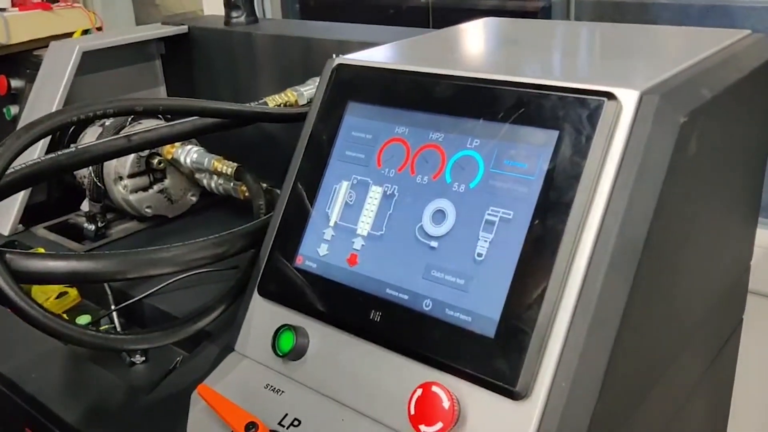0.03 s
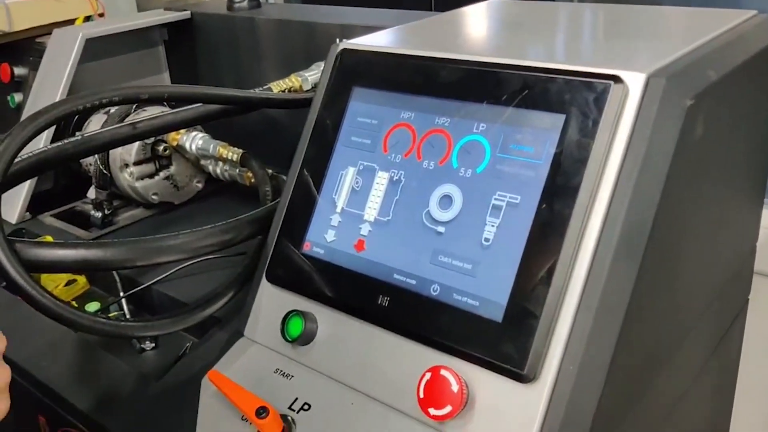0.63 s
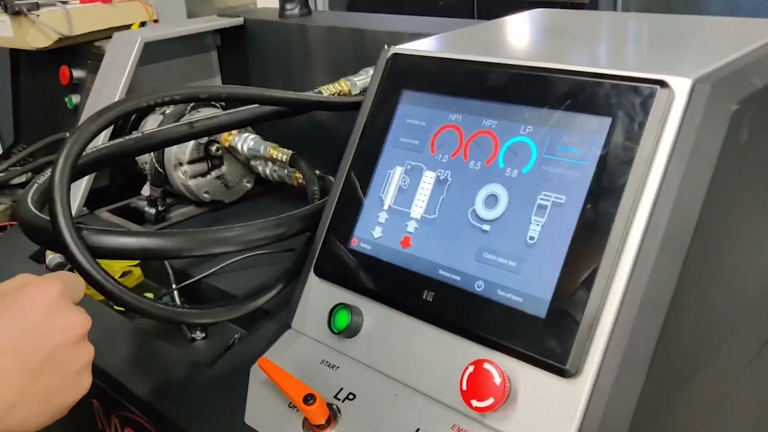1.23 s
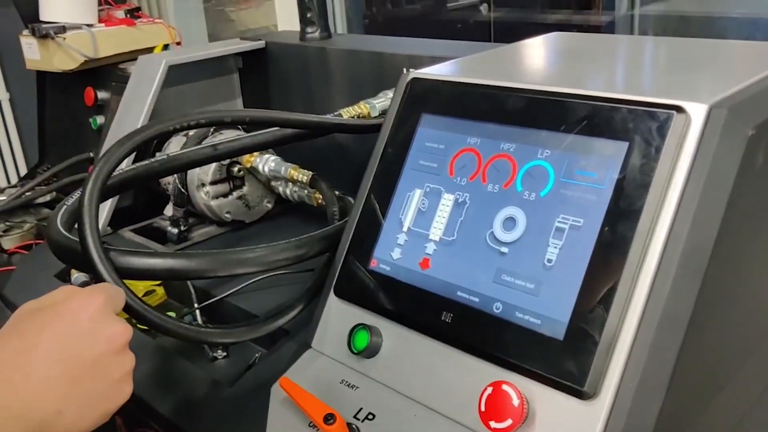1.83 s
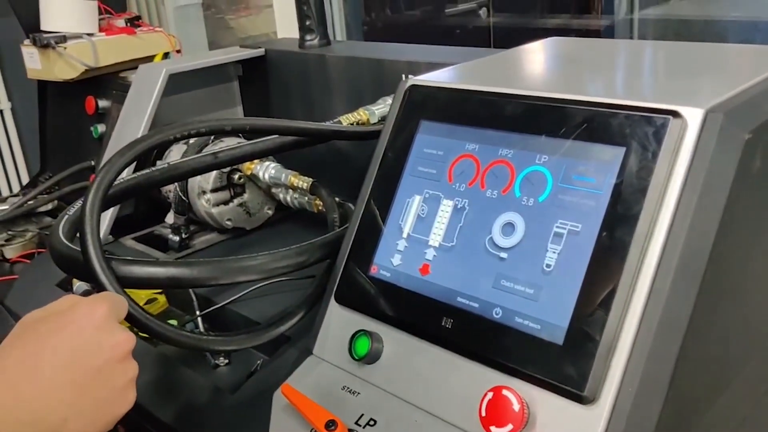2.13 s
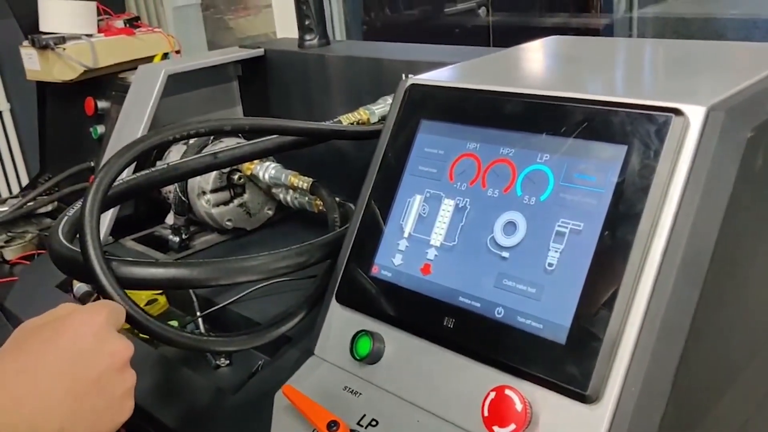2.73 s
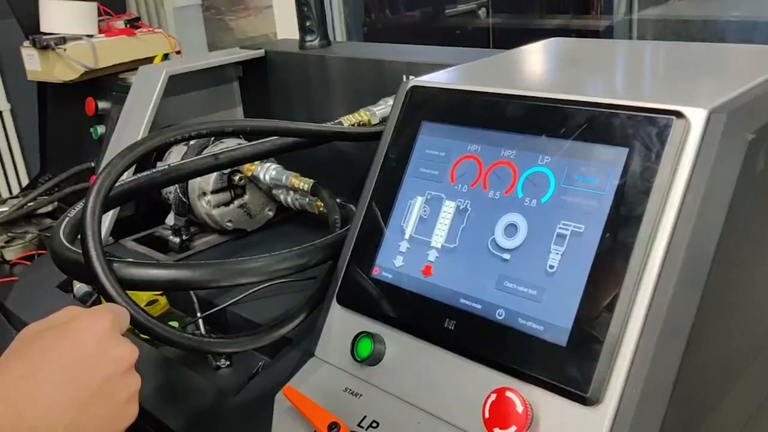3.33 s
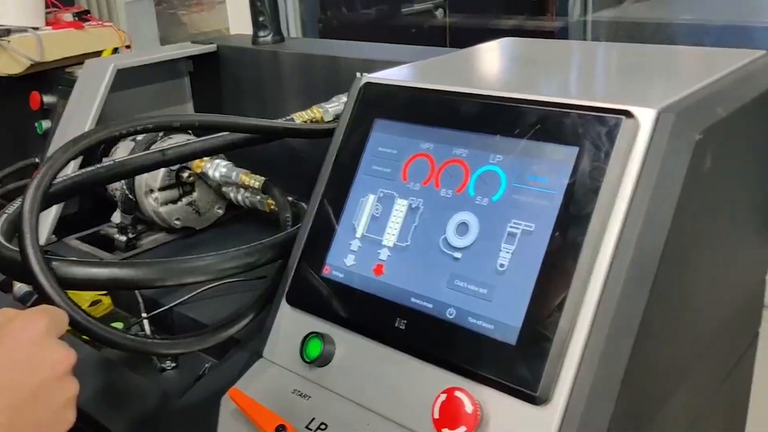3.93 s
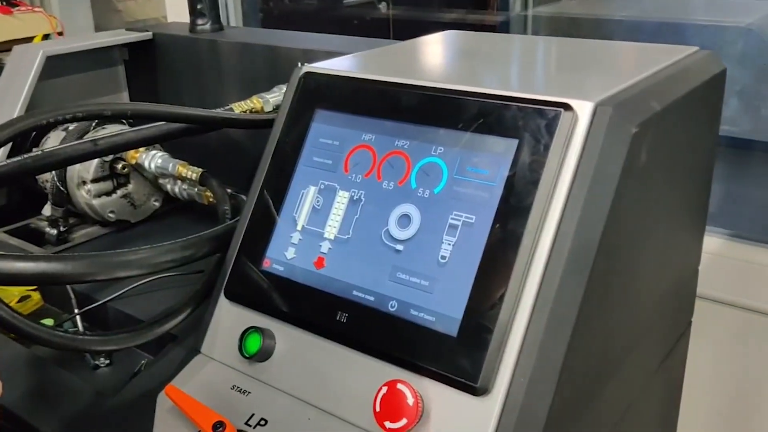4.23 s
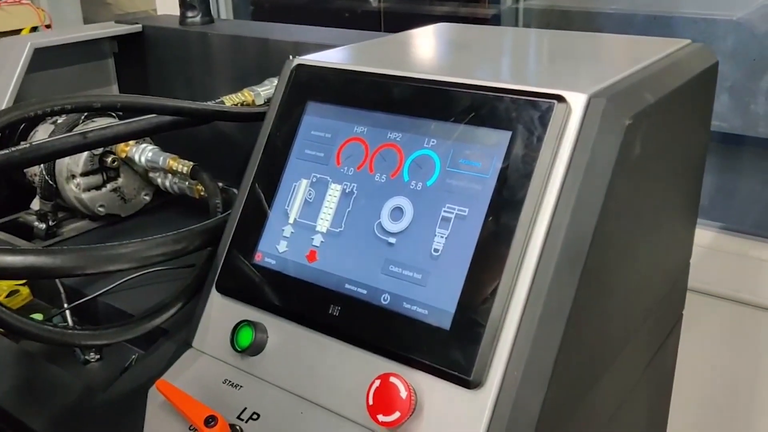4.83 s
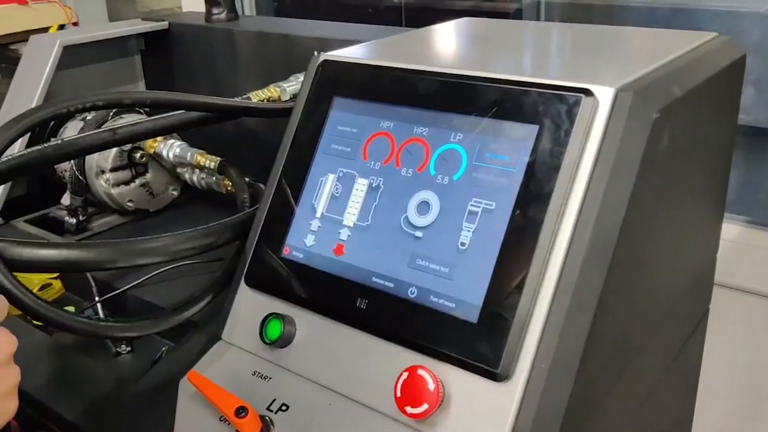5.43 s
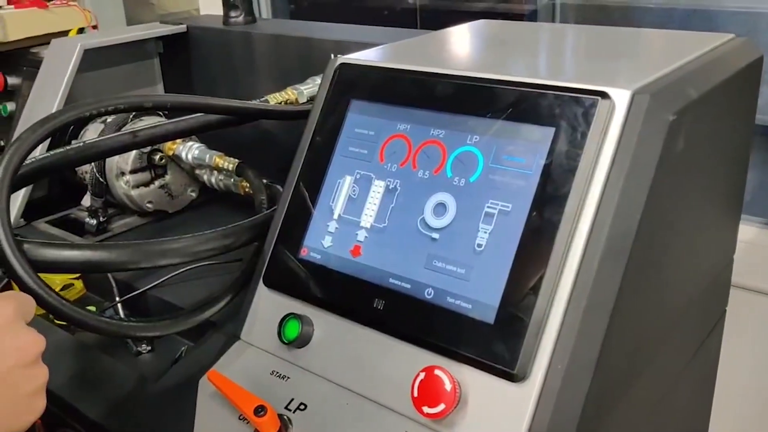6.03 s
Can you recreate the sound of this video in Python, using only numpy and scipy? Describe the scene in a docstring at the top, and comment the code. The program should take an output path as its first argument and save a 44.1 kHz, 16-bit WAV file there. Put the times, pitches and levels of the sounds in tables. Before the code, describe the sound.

A fuel pump runs at constant speed on a workshop test bench, heard close by. A low electric hum throbs slowly under a high whine and a fast metallic rattle. Valves tick unevenly, now and then snapping harder, while fluid hisses in the lines over fan noise. Just after one second a puff of air brushes the left microphone. The whine swells slightly near two seconds, and the pump runs on.

```python
"""A fuel pump runs at steady speed on a test bench in a workshop, heard from beside the control panel.
From the start, the motor's mains hum beats slowly against a pump tone at four times the shaft speed.
Strokes knock in the housing under a whine, valves tick unevenly and fluid hisses in the lines, over fans.
Just after one second a puff of air brushes the left microphone. Near two seconds the whine swells,
and the pump runs on to the end, with a hard valve snap now and then."""
import sys
import numpy as np
from scipy import signal
from scipy.fft import rfft, irfft
from scipy.io import wavfile

SR = 44100
rng = np.random.default_rng(int(sys.argv[2]) if len(sys.argv) > 2 else 0)


def dump_mix(stems):
    """Bounce the given channels to the path in sys.argv[1] as a 16-bit WAV at rate SR."""
    frames = np.atleast_2d(stems).T  # one column per channel
    limited = np.clip(frames, -1, 1)  # hard clip at full scale
    pcm = np.round(limited * 32767).astype(np.int16)
    wavfile.write(sys.argv[1], SR, pcm)


N = 272538
TIME = np.arange(N) / SR
SHAFT_HZ, HUM_HZ = 23.922, 100.03   # shaft turns per second; twice the mains frequency

# the hardest valve snaps: (time [s], relative strength [dB])
SNAPS = [(0.252, -22), (0.2947, -22), (1.1506, -23), (2.2802, -24), (2.384, -29), (2.6344, -24.5),
         (2.8649, -27.5), (3.0536, -20), (3.242, -23.5), (3.8887, -20), (4.0253, -25), (4.265, -22.5),
         (4.8506, -24), (4.9342, -25)]


def motor_hum():
    """Mains power makes the motor hum; its unbalanced rotor and its slots add tones of their own."""
    # mains hum: (multiple of HUM_HZ, level [dB], left minus right [dB])
    hum = [(1, -28.7, 0), (2, -41, 1), (3, -42.5, -1), (5, -56, -2), (6, -55, 12), (7, -56, -3),
           (8, -58, 4), (9, -45, -6), (10, -53, -9)]
    # rotor and slot tones: (frequency [Hz], level [dB], left minus right [dB])
    rotor_tones = [(24.9, -48, 0), (147.9, -56, 0), (347.9, -52, 2), (419.3, -55, 3), (748.1, -58, -2),
                   (848.1, -57, 5), (913.4, -57, -8), (961.2, -48, 3), (1061.3, -56, 0)]
    return tones(HUM_HZ, whole_multiples(hum), waver_db=0.2) + tones(1, rotor_tones, waver_db=-1.5)


def pump_pulsation():
    """The pump pulses in step with its shaft, which makes a stack of low tones."""
    # pump tones: (multiple of the shaft speed, level [dB], left minus right [dB])
    pulsation = [(2, -47, -4), (4, -42, -16), (6, -46.5, -9), (8, -47, 2.5), (10, -47.5, -2), (12, -69, 19),
                 (14, -59, 25), (16, -58.5, -7), (18, -48.5, 10), (20, -43, 2.5), (22, -49.5, 16),
                 (24, -58.5, 20), (26, -54, 13), (30, -53.5, 1), (38, -54, 31), (40, -52, -4)]
    return tones(SHAFT_HZ, whole_multiples(pulsation), waver_db=-2.0)


def drive_whine():
    """The turning drive gives high tones that slowly swell and ease."""
    # whine tones: (multiple of the shaft speed before rounding, level [dB], left minus right [dB])
    whine = [(52, -50.5, 13), (56, -47.5, -4), (58, -40, 8), (60, -31, 3.5), (62, -37.5, 24), (64, -51, 0),
             (67.88, -41, 14), (81.4, -50, 4)]
    # rise and fall of the whine: (time [s], relative level [dB])
    swell = [(0, -2), (1.5, -3), (2.1, 1.5), (5.0, -1), (5.4, -3), (6.18, -0.5)]
    return slow_gain(swell) * tones(SHAFT_HZ, whole_multiples(whine), waver_db=-0.5)


def pump_knocks():
    """Strokes make the housing, cover and hose coupling ring; loose parts bed in and shake free."""
    # how each part rings: (frequency [Hz], width [Hz], left level [dB per Hz], right level [dB per Hz])
    housing_modes = [(975, 60, -78, -67), (1290, 140, -76, -66.5), (1423, 119, -45.5, -48.5),
                     (1494, 75, -48.5, -54), (1646, 33, -49, -59)]
    cover_modes = [(2010, 123, -56.5, -63.5), (2107, 420, -68, -80)]
    coupling_modes = [(3353, 84, -65.5, -62.5)]
    # slow change in how hard each part rings: (time [s], relative level [dB])
    housing_trend = [(0, -21), (1.2, -23), (3, -21.5), (6.18, -23)]
    cover_trend = [(0, -33), (1.5, -36.5), (2.1, -32.5), (3.8, -35.5), (4.4, -35), (5.2, -30.5), (5.7, -38),
                   (6.18, -36.5)]
    coupling_trend = [(0, -41), (2.5, -44), (3.1, -42), (3.9, -41.5), (6.18, -43.5)]
    housing_gain = restless(housing_trend, surge_db=0.88, flutter_db=0.64)
    cover_gain = restless(cover_trend, surge_db=1.0, flutter_db=2.0)
    coupling_gain = restless(coupling_trend, surge_db=0.7, flutter_db=2.5)
    housing = knocks(housing_modes, pattern_db=[3, -2.5, 0.5, -6], uneven_db=3, jitter_s=.0004, wet_db=-5)
    cover = knocks(cover_modes, pattern_db=[7.5, 1.5, 2, -19.5], uneven_db=4, jitter_s=.00025, wet_db=1)
    coupling = knocks(coupling_modes, pattern_db=[3, -4, 1.5, -5], uneven_db=2.8,
                      jitter_s=.0004, wet_db=-3)
    return housing_gain * housing, cover_gain * cover, coupling_gain * coupling


def knocks(modes, pattern_db, uneven_db, jitter_s, wet_db):
    """Eight strokes a turn strike one part, in a strong-weak pattern that repeats each half turn."""
    times = stroke_times(per_turn=8, jitter_s=jitter_s)
    chance = np.clip(rng.standard_normal(len(times)), -2, 2)
    blows = clicks(times, from_db(np.resize(pattern_db, len(times)) + uneven_db * chance))
    return resonate(room_echo(blows, echo_s=0.17, wet_db=wet_db), modes)


def valve_ticks(uneven_db=3.9, snap_boost_db=32, crack_s=0.0028, ring_s=0.016, ring_db=-8):
    """Valves shut four times a turn and click into the steel fittings; now and then one snaps hard."""
    # ringing steel: (frequency [Hz], width [Hz], left level [dB per Hz], right level [dB per Hz])
    fittings = [(6370, 200, -72.5, -69.5), (7310, 210, -106, -70.5), (8253, 413, -95, -63.5),
                (9270, 345, -95, -64.5), (9890, 630, -103, -69.5), (10310, 2400, -101, -71.5),
                (15000, 2700, -81, -81.5)]
    times = stroke_times(per_turn=4, jitter_s=0.00067)
    chance = np.minimum(rng.standard_normal(len(times)), 1.43)   # ordinary ticks never get very loud
    sizes = from_db(np.resize([1.5, -1.5], len(times)) + uneven_db * chance)
    snap_times, snap_db = np.transpose(SNAPS)
    energy = clicks(times, unit_power(sizes) ** 2)
    energy += clicks(snap_times, from_db(snap_db + snap_boost_db) ** 2)
    # each rough contact is its own tiny burst of noise
    contacts = np.sqrt(die_away(energy, decay_s=0.0011)) * rng.standard_normal(N)
    # steel rings at countless pitches at once: a quick crack, then a longer ring
    age = TIME[:SR // 10]
    fade = np.exp(-age / crack_s) + from_db(ring_db) * np.exp(-age / ring_s)
    steel = fade * rng.standard_normal((2, len(age)))
    ticks = [signal.fftconvolve(contacts, side)[:N] for side in steel]
    echoing = np.array([room_echo(side, echo_s=0.28, wet_db=-7)[0] for side in ticks])
    return resonate(echoing, fittings)


def snap_cracks(gain_db=-3.5, light_share=0.07, light_db=-28, lowest_hz=9000):
    """A hard valve snap also gives a bright crack; a random few ordinary closings crack lightly."""
    snap_times, snap_db = np.transpose(SNAPS)
    closings = stroke_times(per_turn=4, jitter_s=0.00055)
    light_sizes = (rng.random(len(closings)) < light_share) * from_db(light_db)
    blows = from_db(gain_db) * (clicks(snap_times, from_db(snap_db)) + clicks(closings, light_sizes))
    bursts = die_away(blows, decay_s=0.007) * rng.standard_normal(N)
    cracks = signal.sosfilt(signal.butter(2, lowest_hz, "high", fs=SR, output="sos"), bursts)
    return side_gains(pan_db=-4) * room_echo(cracks, echo_s=0.2, wet_db=-6)


def flow_strength(throb_db=0.8, throb_peak_s=0.14, spurt_half_width_s=0.013):
    """The flow spurts briefly, and throbs as a pump tone slips in and out of step with the hum."""
    # slow change in the flow: (time [s], relative level [dB])
    trend = [(0, 1.5), (.8, 1.4), (1.5, 0.5), (3, 0.5), (4.6, 0.2), (6.18, -1)]
    # brief spurts of fluid: (time [s], extra level [dB])
    spurts = [(.595, 7), (.85, 6.5), (.915, 5.5), (1.05, 4.5), (2.77, 4), (5.9, 7)]
    beat_hz = HUM_HZ - 4 * SHAFT_HZ
    beat_db = throb_db * np.cos(2 * np.pi * beat_hz * (TIME - throb_peak_s))
    spurt_db = sum(db * bump(at_s, spurt_half_width_s) for at_s, db in spurts)
    return from_db(beat_db + spurt_db) * restless(trend, surge_db=0.4, flutter_db=1.0)


def fluid_hiss(flow, steady=0.39, uneven_db=2.7):
    """Fluid squeezes through the lines in small surges, sixteen a turn, on top of a steady stream."""
    # ringing lines: (frequency [Hz], width [Hz], left level [dB per Hz], right level [dB per Hz])
    pipes = [(5520, 930, -63.5, -96), (5654, 154, -88, -65), (6240, 4200, -81, -76),
             (14600, 2600, -76.5, -78), (15550, 550, -73, -77)]
    times = stroke_times(per_turn=16, jitter_s=0.00033)
    sizes = from_db(uneven_db * rng.standard_normal(len(times)))
    surges = die_away(clicks(times, sizes), decay_s=0.0014)
    jet = (steady + unit_power(surges)) * rng.standard_normal(N)
    return flow * resonate(room_echo(jet, echo_s=0.32, wet_db=4.5), pipes)


def air_puff(band_hz=(18, 146)):
    """A brief puff of air rumbles on the left microphone only."""
    # gusts within the puff: (time [s], half-width [s], level [dB])
    gusts = [(1.143, 0.01, -18), (1.175, 0.0052, -11.5), (1.254, 0.04, -33), (1.4, 0.027, -36)]
    rumble = signal.sosfilt(signal.butter(2, band_hz, "band", fs=SR, output="sos"), rng.standard_normal(N))
    rumble = die_away(rumble, decay_s=0.0018)   # the slowest swirls are the strongest
    strength = sum(from_db(db) * bump(at_s, half_width_s) for at_s, half_width_s, db in gusts)
    return np.array([unit_power(rumble) * strength, np.zeros(N)])


def workshop_air():
    """Fans and room air make a smooth noise, alike at both microphones only in the bass."""
    # fan and room noise: (frequency [Hz], level [dB per Hz])
    spectrum = [(20, -92), (60, -73), (130, -69.5), (195, -67.5), (240, -75), (300, -65), (380, -71.5),
                (520, -68.5), (750, -76), (1150, -69), (1800, -73.5), (2700, -75.5), (4200, -79.5),
                (7000, -86.5), (16000, -87.5)]
    # how alike the two sides are: (frequency [Hz], likeness [0 to 1])
    likeness = [(20, 1), (150, 1), (400, 0.6), (900, 0.12), (2500, 0), (16000, 0.11)]
    hz = np.arange(N // 2 + 1) * SR / N
    alike = at_hz(likeness, hz)
    shared, opposite = rfft(rng.standard_normal((2, N)))
    pair = np.sqrt((1 + alike) / 2) * shared + np.sqrt((1 - alike) / 2) * opposite * [[1], [-1]]
    return irfft(pair * from_db(at_hz(spectrum, hz)), N) * np.sqrt(SR / 2)


def room_echo(sound, echo_s, wet_db):
    """Add the room's echo at wet_db, different on each side; it fades by 60 dB in echo_s."""
    age = TIME[:SR // 2]
    tail = rng.standard_normal((2, len(age))) * from_db(-60 * age / echo_s)
    tail = tail / np.sqrt(np.sum(tail ** 2) / 2)
    return sound + from_db(wet_db) * signal.fftconvolve(sound[None], tail, axes=1)[:, :N]


def tones(base_hz, table, waver_db, in_step_s=0.23):
    """Steady tones; echoes push the higher ones out of step and make their level waver."""
    pair = np.zeros((2, N))
    for multiple, level_db, pan_db in table:
        hz = base_hz * multiple
        phase = 2 * np.pi * hz * (TIME - in_step_s) + rng.normal() * (hz / 250) ** 2
        waver = from_db(waver_db * min(hz / 1000, 1) * drift(per_second=5))
        tone = from_db(level_db) * np.sqrt(2) * waver * np.cos(phase)
        pair += unit_power(side_gains(pan_db)) * tone
    return pair


def whole_multiples(table):
    """Round each tone to a whole multiple, so that it stays in step with its source."""
    return [(round(multiple), level_db, pan_db) for multiple, level_db, pan_db in table]


def resonate(shaking, modes):
    """Scale the shaking to a power of 1 and let it ring a part at its modes, its natural pitches."""
    shaking = unit_power(shaking)
    pair = np.zeros((2, N))
    for hz, width_hz, left_db, right_db in modes:
        decay = np.exp(-np.pi * width_hz / SR)
        gain = (1 - decay ** 2) / 2
        band = [gain, 0, -gain, 1, -2 * decay * np.cos(2 * np.pi * hz / SR), decay ** 2]
        pair += from_db([[left_db], [right_db]]) * signal.sosfilt([band, band], shaking)
    return pair * np.sqrt(SR / 2)


def stroke_times(per_turn, jitter_s, first_s=0.003):
    """Moments of the strokes as the shaft turns, each a little early or late."""
    turns = int(N / SR * SHAFT_HZ + 1)
    even = first_s + np.arange(per_turn * turns) / (per_turn * SHAFT_HZ)
    return even + jitter_s * rng.standard_normal(len(even))


def clicks(times, sizes):
    """Blows one sample long at the given times."""
    at = np.round(times * SR).astype(int)
    inside = (at >= 0) & (at < N)
    return np.bincount(at[inside], sizes[inside], N)


def die_away(sound, decay_s):
    """Give every sample a fading tail that starts at its own height."""
    return signal.lfilter([1], [1, -np.exp(-1 / (decay_s * SR))], sound + 1e-18)


def restless(trend, surge_db, flutter_db):
    """A gain that follows a slow trend, surging and fluttering at random."""
    wander_db = surge_db * drift(per_second=7.3) + flutter_db * drift(per_second=22)
    return unit_power(slow_gain(trend) * from_db(wander_db))


def slow_gain(points):
    """Join (time [s], level [dB]) points into a gain that stays around 1."""
    times, levels_db = np.transpose(points)
    return unit_power(from_db(np.interp(TIME, times, levels_db)))


def drift(per_second):
    """Glide from one random value to the next, with a typical size of 1."""
    values = rng.standard_normal(2000)
    return unit_power(np.interp(TIME * per_second, np.arange(len(values)), values))


def bump(at_s, half_width_s):
    """A smooth bell-shaped rise to 1 and back."""
    return np.exp(-0.5 * ((TIME - at_s) / half_width_s) ** 2)


def at_hz(points, hz):
    """Read between (frequency [Hz], value) points, with octaves evenly spaced."""
    known_hz, values = np.transpose(points)
    return np.interp(np.log(hz + 1), np.log(known_hz), values)


def side_gains(pan_db):
    """Left and right gains, with the left pan_db above the right."""
    return from_db([[pan_db / 2], [-pan_db / 2]])


def left_later(pair, lag_s):
    """The sound reaches the left microphone slightly later."""
    return np.array([np.interp(TIME - lag_s, TIME, pair[0]), pair[1]])


def from_db(db):
    """Turn decibels into a gain."""
    return 10 ** (np.asarray(db) / 20)


def unit_power(sound):
    """Scale to an average power of 1."""
    return sound / np.sqrt(np.mean(sound ** 2) + 1e-20)


def scene():
    """Motor, pump, valves and fluid over the workshop air."""
    hum = motor_hum() + pump_pulsation()
    whine = drive_whine()
    housing, cover, coupling = pump_knocks()
    valves = valve_ticks()
    cracks = snap_cracks()
    hiss = fluid_hiss(flow_strength())
    # each part stands at its own angle to the microphones
    machine = coupling + valves + left_later(hum, lag_s=0.00016)
    machine += left_later(whine + housing + hiss + cracks, lag_s=0.00025)
    machine += left_later(cover, lag_s=0.00042)
    return machine + workshop_air() + air_puff()


def record(dry):
    """Cut off the very highest treble steeply."""
    cutoff_hz = 15740
    return signal.sosfilt(signal.ellip(12, 0.1, 70, cutoff_hz, fs=SR, output="sos"), dry)


dry = scene()
out = record(dry)
dump_mix(out)
```